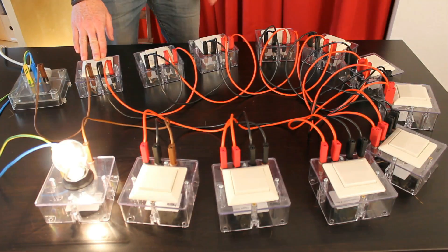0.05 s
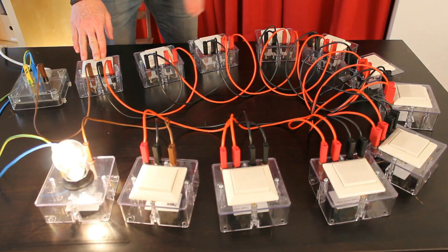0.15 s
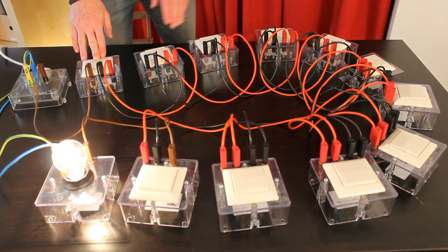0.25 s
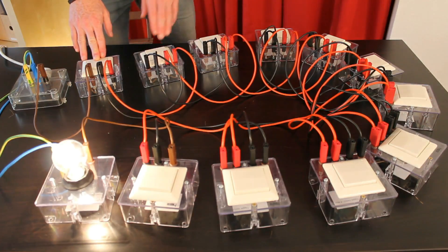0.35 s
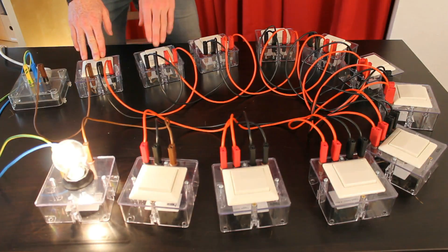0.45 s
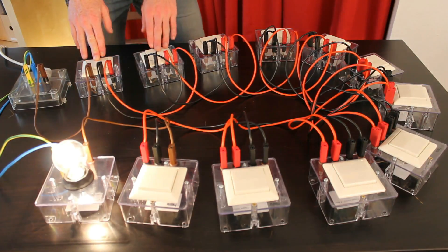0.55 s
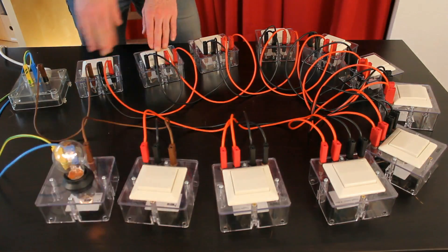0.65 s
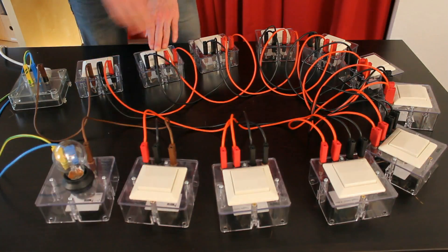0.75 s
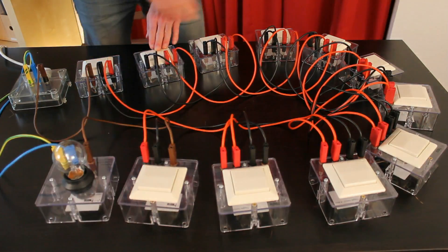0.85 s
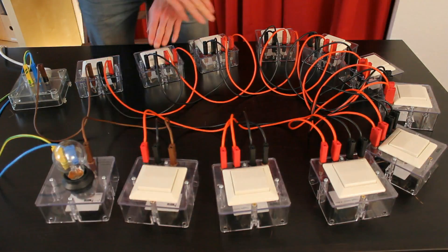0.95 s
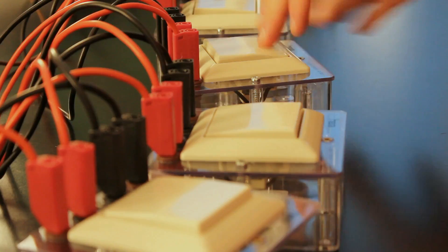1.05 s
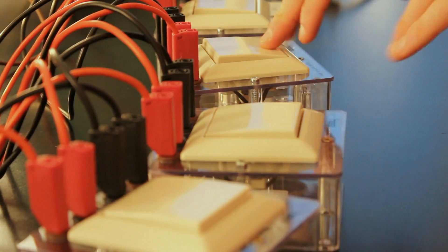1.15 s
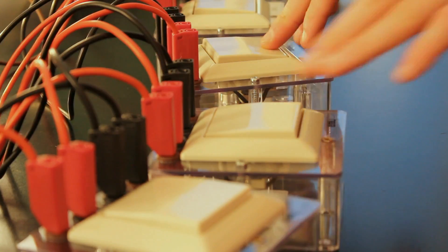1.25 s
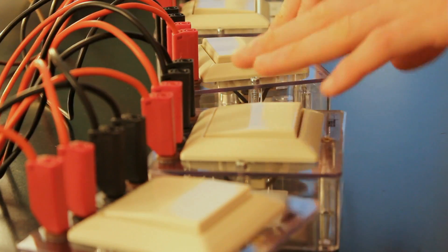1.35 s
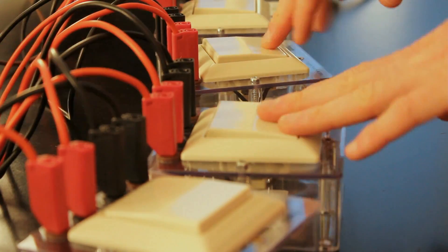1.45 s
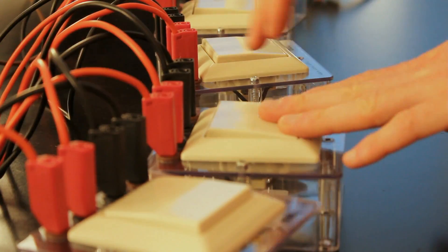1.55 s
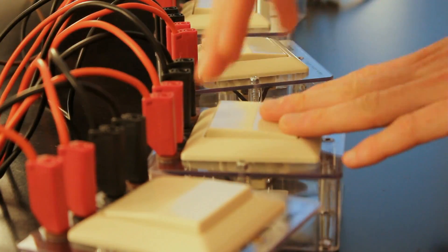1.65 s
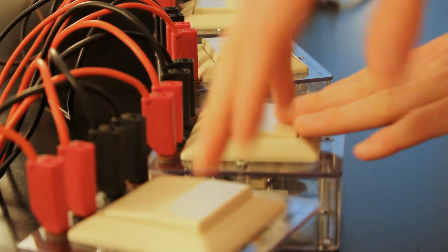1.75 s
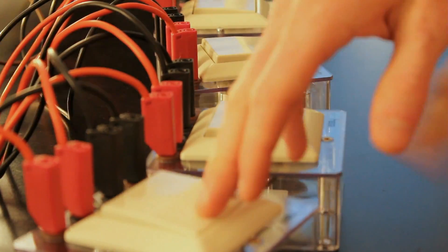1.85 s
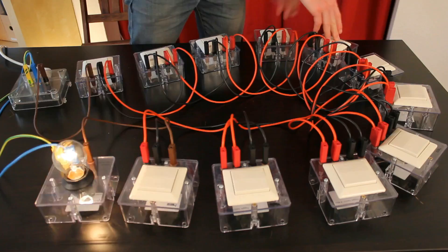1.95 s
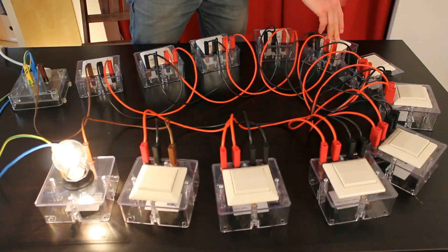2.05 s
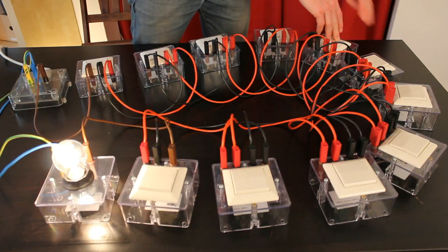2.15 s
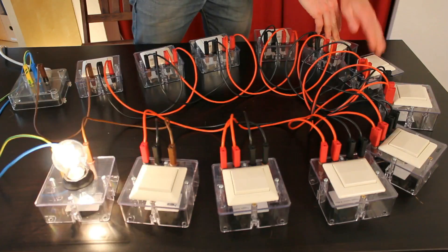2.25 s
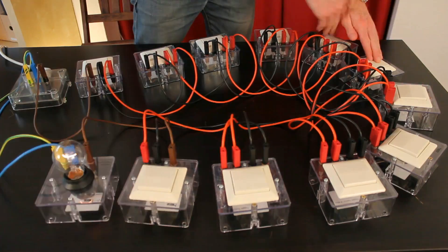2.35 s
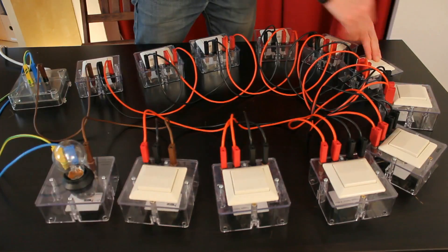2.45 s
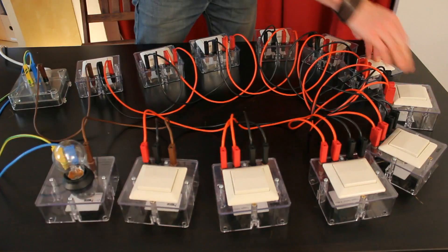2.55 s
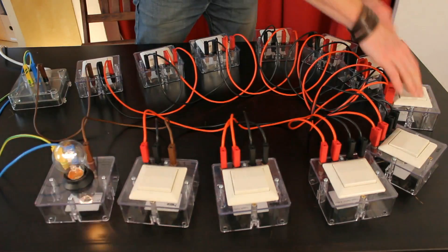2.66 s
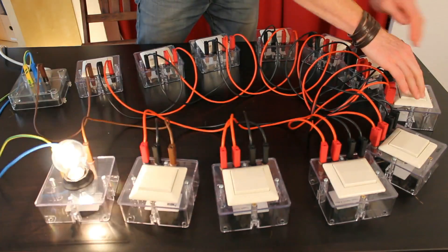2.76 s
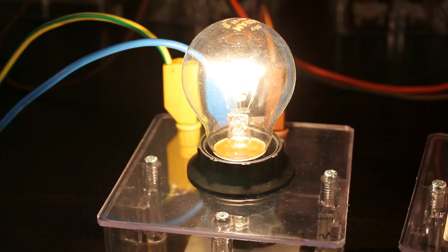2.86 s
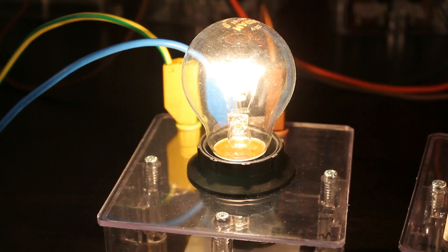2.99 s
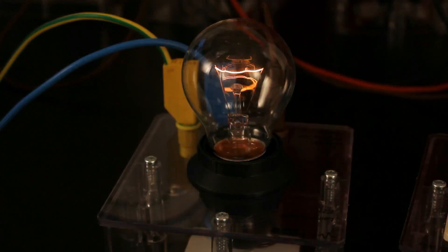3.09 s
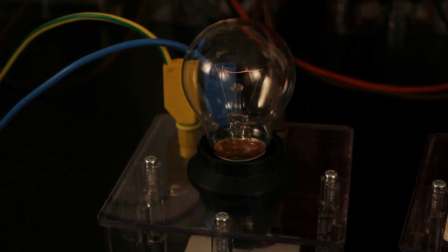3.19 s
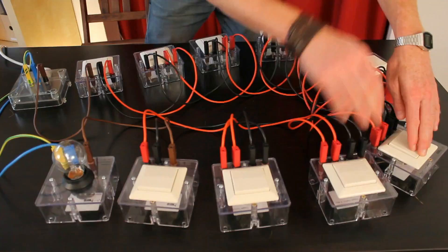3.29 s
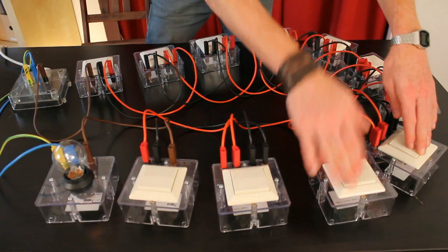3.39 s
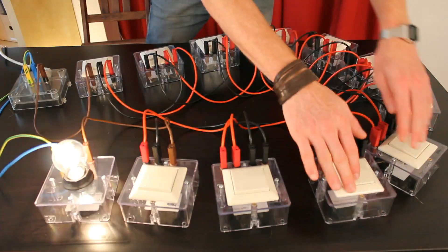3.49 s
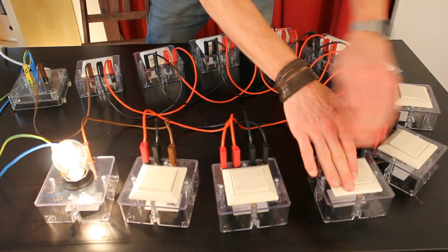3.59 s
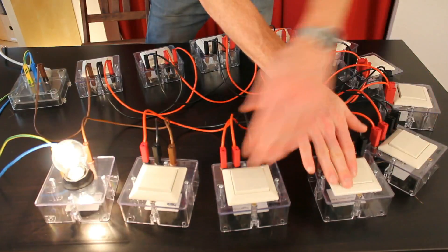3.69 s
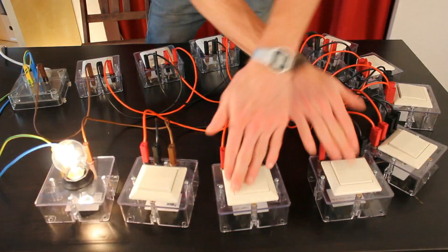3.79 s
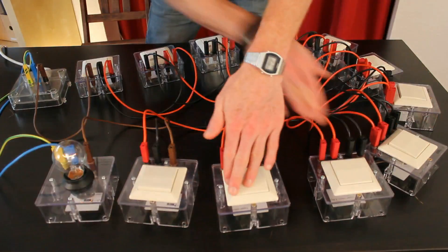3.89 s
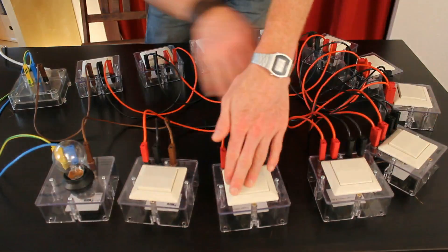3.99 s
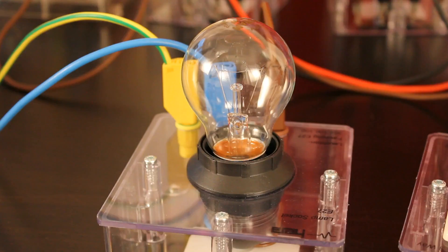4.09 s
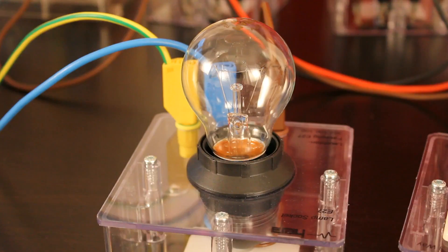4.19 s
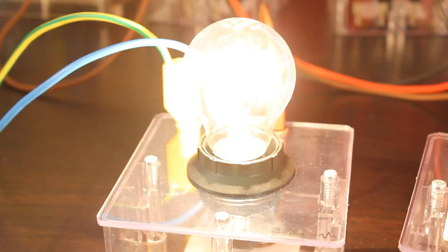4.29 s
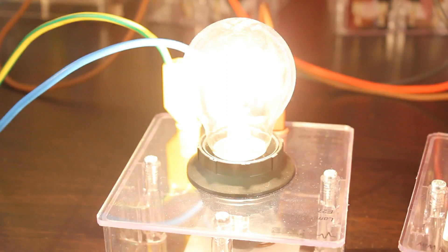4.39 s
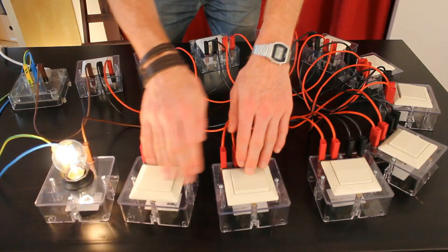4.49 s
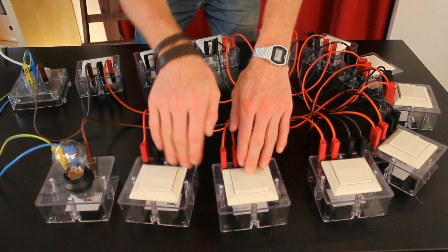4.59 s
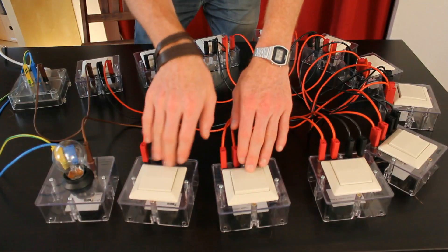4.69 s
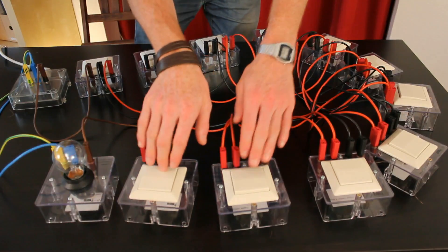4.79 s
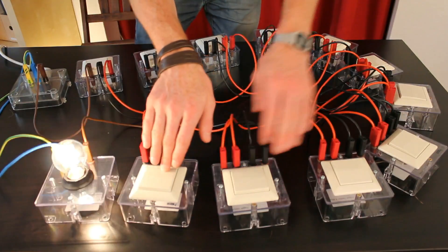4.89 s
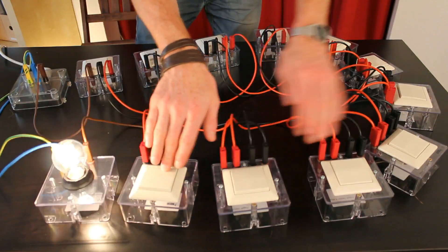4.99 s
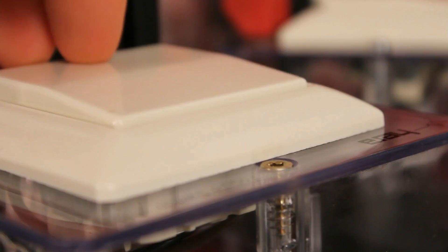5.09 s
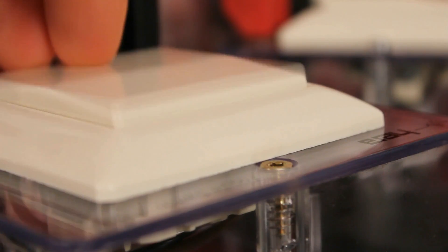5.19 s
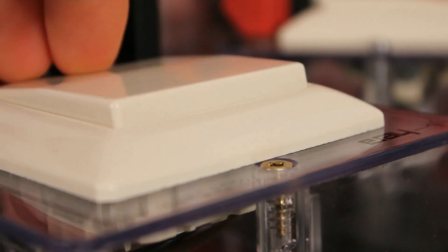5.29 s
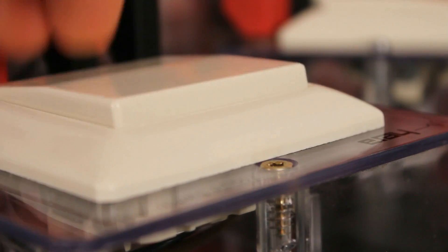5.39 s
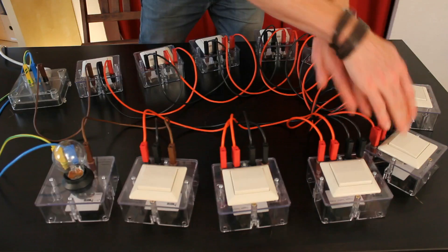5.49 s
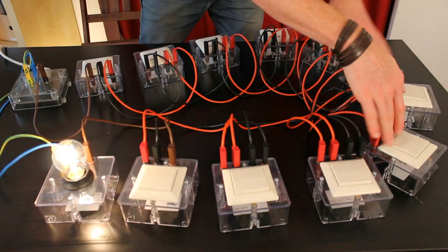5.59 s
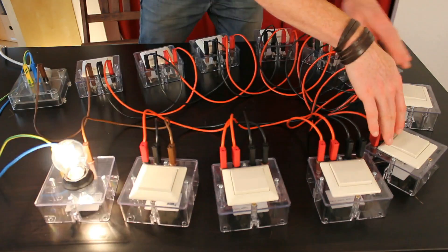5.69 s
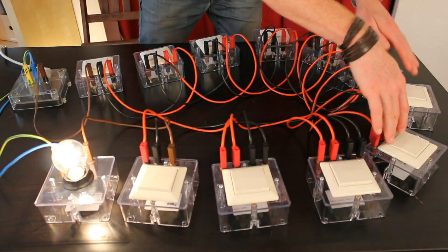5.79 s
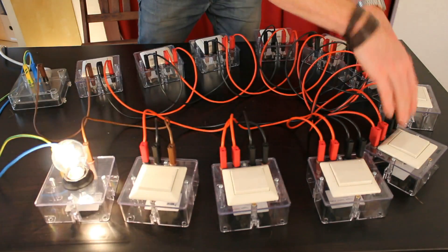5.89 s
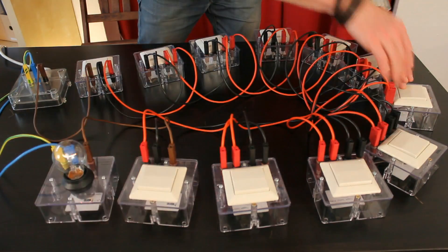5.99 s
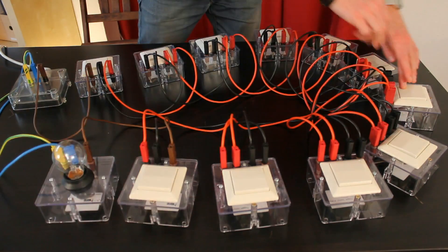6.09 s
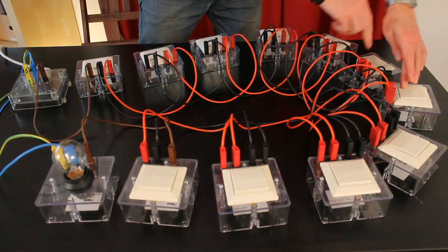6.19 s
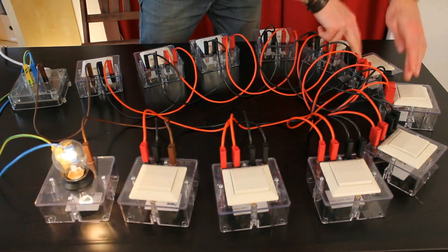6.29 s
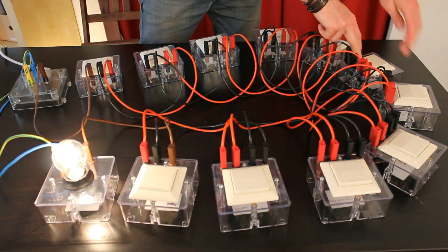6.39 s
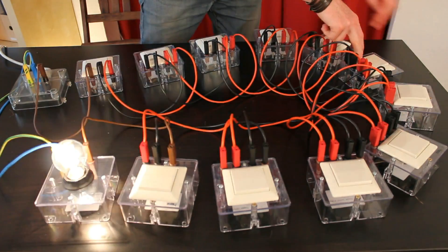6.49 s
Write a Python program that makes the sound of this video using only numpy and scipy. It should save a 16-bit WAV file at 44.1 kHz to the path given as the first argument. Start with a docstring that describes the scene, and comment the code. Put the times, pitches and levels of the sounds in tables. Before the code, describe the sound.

In a small room with short reflections, fingers work along a set of rocker switches on a table, close to two microphones. Sixteen plastic clicks follow at an even pace, some crisp and bright, others duller, each lightly ringing the hollow box under it. Soft, dull knocks of fingertips landing on the boxes fall among the clicks, over faint room tone.

```python
"""In a small, live room, fingers softly bump a clear plastic box on a table, close to two microphones.
From 0.7 s to 6.4 s sixteen clicks of rocker switches on plastic boxes follow one another,
each with its own tone. A finger tips the rocker, the spring snaps over and the rocker hits its stop;
box and table ring, and the room answers. More soft bumps fall between the presses."""
import sys
import numpy as np
from scipy import signal
from scipy.fft import rfft, irfft
from scipy.io import wavfile
from scipy.ndimage import uniform_filter1d

SR = 44100
rng = np.random.default_rng(int(sys.argv[2]) if len(sys.argv) > 2 else 0)


def persist_wave(psi):
    """Save psi, clipped to +-1, as 16-bit WAV."""
    counts = np.round(np.clip(psi, -1, 1) * 32767).astype(np.int16)
    wavfile.write(sys.argv[1], SR, np.atleast_2d(counts).T)


N = 288816
SIZE = 32768  # samples in one hit with its tail
HZ, T = np.fft.rfftfreq(SIZE, 1 / SR), np.arange(SIZE) / SR


def switches(lead_s=.05, usual_tip_s=.005, stop_db=-1.5, lid_db=-28, box_db=-3):
    """The rocker tips, snaps and hits its stop; the snap also sets the hollow box and the table ringing."""
    # one row a press: snap_s, level_db, bright_db_per_octave, tip_s, rub_db, thump_hz, thump_db,
    # lid_hz, ping_hz, shake_db, shake_tilt_db_per_octave
    presses = [ (0.7000, 0.5, -1.06, 0.0072, -15, 364, -18, 1240, 2510, 2.5, 0.5),
               (1.1218, 1, -.5, 0.0053, -17.5, 220, -22.5, 607, 2630, 12.5, 3.5),
               (1.5230, -3, 0, 0.0035, -16.5, 330, -28.5, 650, 2460, 4.5, 8),
               (2.0132, -1, 0, .006, -4.5, 235.6, -23.5, 1093, 1700, -8, 4),
               (2.3946, -1, 0, 0.0094, -3, 284, -31, 900, 4700, 1.5, 2.5),
               (2.7618, -1.16, .1, .006, -1, 334, -24.5, 650, 2840, -0.5, -6.5),
               (3.1271, 1.75, -0.3, 0.0034, -13, 359, -17, 1334, 4000, 10, 6),
               (3.5, 2.4, 0, 0.0076, -16, 323, -29, 510, 2200, 9.5, 8.5),
               (3.8980, 0, 0, .0055, -7, 209, -28.5, 870, 2220, -5, -1),
               (4.293, 1, 0.5, .003, -7, 125, -28, 1340, 1500, 2, 2.5),
               (4.5918, 1, 0.1, 0.0034, -4.5, 224, -25, 990, 9900, -9, -7),
               (4.922, -3.5, -.5, 0.0026, -15.5, 500, -43, 810, 4040, -2.5, -3),
               (5.2736, .7, 0.2, 0.0042, -7, 230, -22.5, 1204, 2730, 1, -2.5),
               (5.6593, -2.5, 0.46, .008, -7, 362, -26.5, 504, 4640, 2, -0.5),
               (6.0210, -2.5, -0.9, 0.012, -10.5, 238.5, -23.5, 582, 7950, 5, 6),
               (6.3859, -1.5, 0, .0055, -7.5, 178, -32, 378, 5800, 4, -3.5)]
    out = np.zeros((2, N))
    for s, db, bright, tip_s, rub_db, thump_hz, thump_db, lid_hz, ping_hz, shake_db, tilt in presses:
        slowness = tip_s / usual_tip_s
        travel_s = .005 * slowness ** .4  # a slowly tipped rocker reaches its stop later
        direct_db = .46 - 2.5 * np.log2(slowness)  # a quick press is crisp, a slow one mostly room
        colour = box_colour(thump_hz, ping_hz)
        rub = pivot_rub(db + rub_db, bright - 1.7, lead_s - tip_s, swell_s=.49 * tip_s, fade_s=.56 * tip_s)
        snap = blow(db, bright, ring_s=.0017) * delayed(lead_s)
        stop = blow(db + stop_db, bright + .085, ring_s=.00056) * delayed(lead_s + travel_s)
        add(out, s - lead_s, in_room(colour * (rub + snap), direct_db))
        add(out, s - lead_s, in_room(colour * stop, direct_db - 2))
        # the whole box swells into its thump; the light lid rings at once
        thump = box_mode(thump_hz, thump_db, t60=.1, rise_s=.004, swing=np.sin)
        lid = box_mode(lid_hz, db + lid_db, t60=.048, rise_s=.0005, swing=np.cos)
        add(out, s, in_room(gain_of(box_db) * (thump + lid), direct_db=9))
        add(out, s, table_shake(shake_db, tilt))
    return out


def pivot_rub(db, bright, peak_s, swell_s, fade_s):
    """The rocker rubs briefly on its pivot as the finger tips it."""
    envelope = np.exp(-np.maximum((peak_s - T) / swell_s, (T - peak_s) / fade_s))
    rub = rng.standard_normal(SIZE) * envelope
    return plastic(db, bright) * rfft(rub / np.linalg.norm(rub))


def blow(db, bright, ring_s, rattle_above_hz=1100):
    """Plastic parts meet in a burst of tiny contacts: one push in the bass, a rattle in the treble."""
    burst = rng.standard_normal(SIZE) * np.exp(-T / ring_s)
    rattle_share = HZ ** 2 / (HZ ** 2 + rattle_above_hz ** 2)
    chatter = rfft(burst / np.linalg.norm(burst)) * np.sqrt(rattle_share) + np.sqrt(1 - rattle_share)
    return plastic(db, bright) * flatten(chatter, bins=420)


def plastic(db, bright, pivot_hz=1500, boost_db=3):
    """Spectrum of struck plastic, tilted by bright dB per octave."""
    # tone of a plastic click: frequency_hz, gain_db
    click = [(30, -10.5), (70, -3), (130, 0), (260, 4), (400, 6), (560, 5.5), (780, -0.5), (1050, 2.5),
             (1550, -0.5), (2000, -5), (2800, -6.5), (4800, -6), (6500, -7), (9500, -6.5), (15500, -14)]
    tilt_db = bright * np.log2(np.maximum(HZ, 150) / pivot_hz)
    return causal(db + boost_db + curve(click, HZ) + tilt_db)


def box_colour(thump_hz, ping_hz):
    """The hollow under a switch resonates above the box's thump; the rocker plate lifts its own pitch."""
    cavity = resonance(1.593 * thump_hz, db=4.5, width=.12)
    plate = resonance(ping_hz, db=4.5, width=.1)
    return causal(cavity + plate)


def box_mode(hz, db, t60, rise_s, swing):
    """Spectrum of one dying vibration of a box."""
    return rfft(gain_of(db - 60 * T / t60) * swing(2 * np.pi * hz * T) * (1 - np.exp(-T / rise_s)))


def finger_bumps(brush_db=-30.5):
    """Dull knocks as fingers land on a box or leave it; the pad damps the box, so its ring is broad."""
    # one row a bump or brush: start_s, level_db, ring_hz, shake_db, shake_tilt_db_per_octave
    bumps = [ (0.628, -21, 340, -10, -1), (0.651, -23, 8500, -26, -11), (0.8781, -17, 3800, -6, -7),
             (0.9738, -19, 1470, -7.5, 3), (1.402, -18, 1660, 3.5, 4.5), (1.836, -29.5, 298, -16.5, -3),
             (2.663, -28, 3330, -21, -5), (3.7566, -21.5, 500, -9, -3.5), (5.992, -22.5, 520, -13, -9.5),
             (6.36, -30, 400, -15, -10)]
    out = np.zeros((2, N))
    for s, db, ring_hz, shake_db, tilt in bumps:
        bright = -.3226 * (db - brush_db)  # a light brush is as bright as a click, a firmer pad duller
        knock = blow(db, bright, ring_s=.005) * causal(resonance(ring_hz, db=8, width=.35))
        add(out, s, in_room(knock, direct_db=0))
        add(out, s, table_shake(shake_db, tilt))
    return out


def table_shake(db, tilt, rise_s=.015, pivot_hz=270, trim_db=-48.5):
    """The push passes through the box into the table, whose low modes swell and die."""
    # modes of the table and the air around it: pitch_hz, level_db, t60_s
    modes = [(74.1, -5, 0.68), (89.2, 2.5, 0.21), (114.6, 0, 0.44), (146.2, 0, 0.38), (218.3, 5, .3),
             (249.2, 2.5, 0.43), (296, 3.5, 0.39), (342.3, -2, 0.42), (385, -10, 0.29)]
    rings = np.zeros(SIZE)
    for hz, mode_db, t60 in modes:
        envelope = gain_of(mode_db + tilt * np.log2(hz / pivot_hz) - 60 * T / t60)
        rings += envelope * np.sin(2 * np.pi * (hz * T + rng.random()))
    return np.tile(gain_of(trim_db + db) * rings * (1 - np.exp(-T / rise_s)), (2, 1))


def in_room(spectrum, direct_db, right_lag_samples=1.47):
    """A hit reaches the microphones directly and as reflections; the left one hears it first."""
    # direct sound against the reflections: frequency_hz, gain_db
    direct = [(100, -15), (300, -10), (600, -4.5), (1500, -8), (4000, -8.5), (10000, -4)]
    path = reflections() + causal(curve(direct, HZ) + direct_db)
    path[1] *= delayed(right_lag_samples / SR)
    fade_out = np.clip(3 - 4 * T / T[-1], 0, 1)
    return irfft(spectrum * path) * fade_out


def reflections(build_s=.0011, even_hz=140):
    """Stereo spectrum of the room's dense reflections, which build up fast and die band by band."""
    # reverb time: frequency_hz, t60_s
    decay = [(70, 0.52), (160, 0.43), (300, 0.33), (650, 0.28), (1400, 0.28), (3200, 0.26), (7000, 0.27),
             (13000, 0.19)]
    # stereo image of the reverb: frequency_hz, left_right_correlation
    image = [(60, 0.49), (1000, 0.72), (3000, 0.75), (4500, 0.58), (6500, -0.85), (10000, -0.031),
             (15000, 0.34)]
    hz, t, bands = signal.stft(rng.standard_normal((2, SIZE)), SR, nperseg=256)
    bands = bands * gain_of(-60 * t / curve(decay, hz)[:, None])
    tail = signal.istft(bands, SR, nperseg=256)[1][:, :SIZE] * (1 - np.exp(-T / build_s))
    diffuse = flatten(rfft(tail), bins=int(even_hz / HZ[1]))  # the same energy in every band
    trimmed = irfft(diffuse) * (T < T[-1] / 2)
    return stereo(rfft(trimmed), image, HZ)


def room_tone(level_db=-64):
    """Steady room tone under the hiss of the microphones."""
    # tone of the noise bed: frequency_hz, density_db
    bed = [(15, -45), (25, -10), (59, -1), (96, -7), (119, -5), (227, -4.5), (260, -7.5), (305, -8),
           (368, -10), (614, -15), (826, -16.5), (1450, -19.5), (1710, -20.5), (15500, -26.5)]
    # stereo image of the bed: frequency_hz, left_right_correlation
    image = [(60, 0.27), (240, 0.16), (950, 0.35), (3770, -0.13), (15000, 0.0064)]
    hz = np.fft.rfftfreq(N, 1 / SR)
    white = stereo(rfft(rng.standard_normal((2, N))), image, hz)
    noise = irfft(white * gain_of(curve(bed, hz)), N)
    return gain_of(level_db) * noise / noise.mean(0).std()


def gain_of(db):
    """Decibels to amplitude."""
    return 10 ** (np.asarray(db) / 20)


def curve(points, hz):
    """Joins (Hz, value) points by straight lines on a log-frequency axis."""
    f, value = np.transpose(points)
    return np.interp(np.log(hz + 1), np.log(f + 1), value)


def resonance(hz, db, width):
    """A peak in dB whose width is a share of its frequency."""
    return db / (1 + ((HZ - hz) / (width * hz)) ** 2)


def causal(db):
    """The spectrum with these gains that starts at once and rings afterwards (minimum phase)."""
    log_gain = np.log(gain_of(db))
    phase = -signal.hilbert(np.r_[log_gain, log_gain[-2:0:-1]]).imag[:len(db)]
    return np.exp(log_gain + 1j * phase)


def flatten(spectrum, bins):
    """Evens out a spectrum's broad shape and keeps its fine grain."""
    return spectrum / np.sqrt(uniform_filter1d(abs(spectrum) ** 2, bins))


def delayed(s):
    """Spectrum of a delay."""
    return np.exp(-2j * np.pi * HZ * s)


def stereo(spectra, image, hz):
    """Two unrelated spectra become a left and a right one of the given correlation."""
    alike = curve(image, hz)
    return np.array([spectra[0], alike * spectra[0] + np.sqrt(1 - alike ** 2) * spectra[1]])


def add(mix, s, sound):
    """Mixes a stereo sound in at s seconds."""
    part = mix[:, round(s * SR):][:, :sound.shape[1]]
    part += sound[:, :part.shape[1]]


def scene(pan_db=.62):
    """Switches and fingers, a little stronger on the right, over the quiet room."""
    return (switches() + finger_bumps()) * gain_of([[-pan_db], [pan_db]]) + room_tone()


def record(dry, edge_hz=16000, offset=-.0019):
    """The converter's band limit and its small steady offset."""
    lowpass = signal.firwin(511, edge_hz, window=("kaiser", 9), fs=SR)
    return signal.oaconvolve(dry, lowpass[None], "same") + offset


dry = scene()
out = record(dry)
persist_wave(out)
```